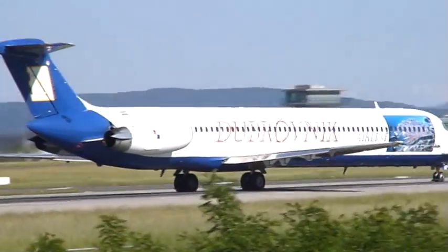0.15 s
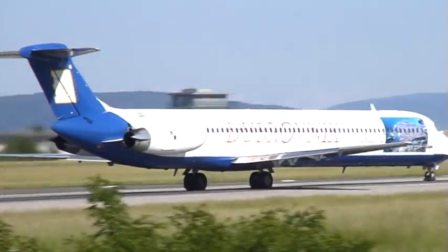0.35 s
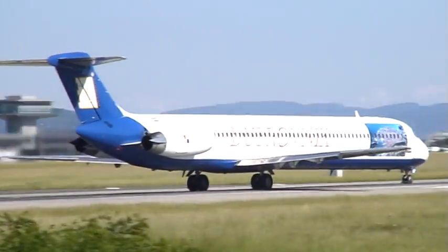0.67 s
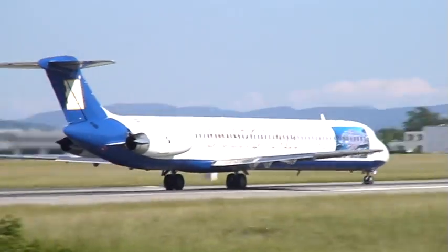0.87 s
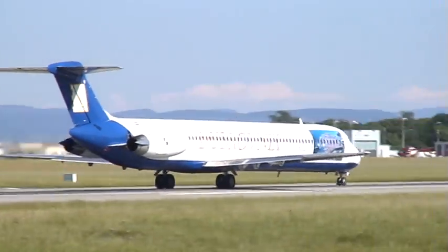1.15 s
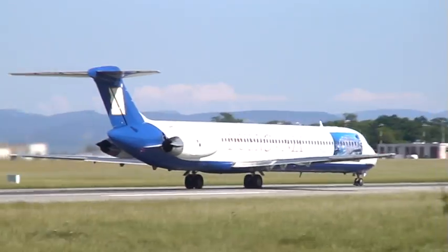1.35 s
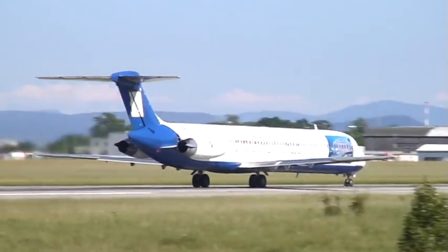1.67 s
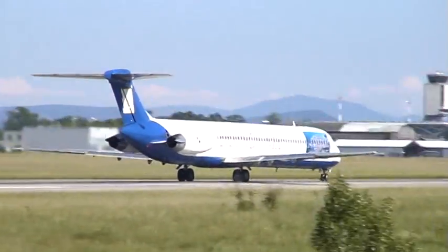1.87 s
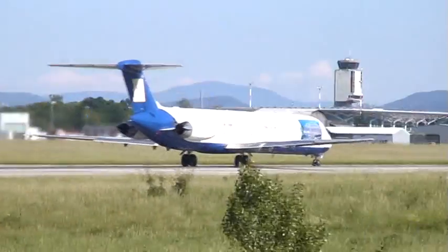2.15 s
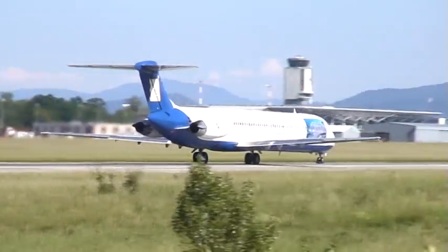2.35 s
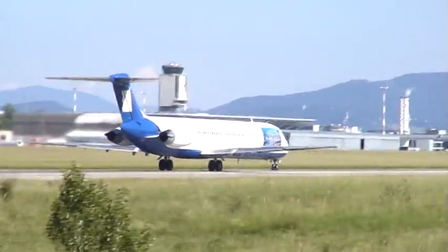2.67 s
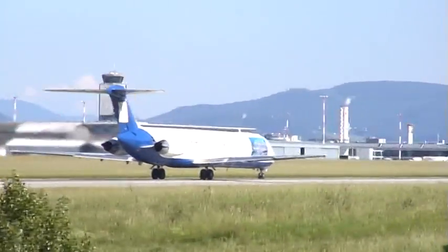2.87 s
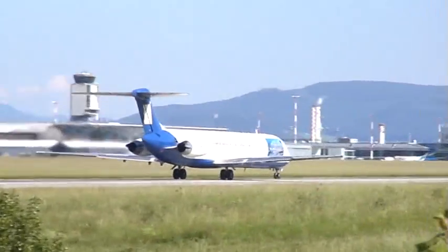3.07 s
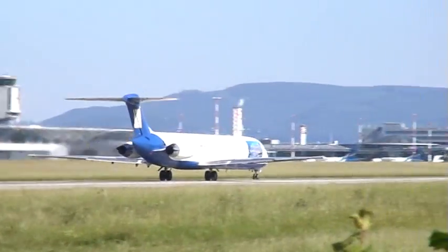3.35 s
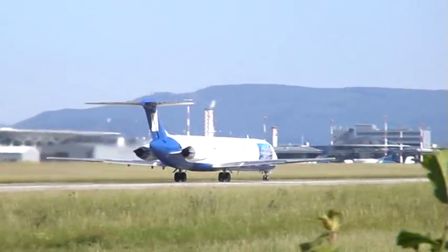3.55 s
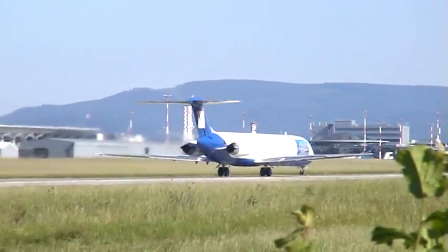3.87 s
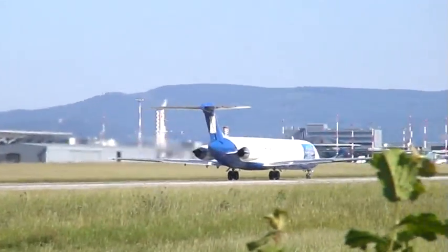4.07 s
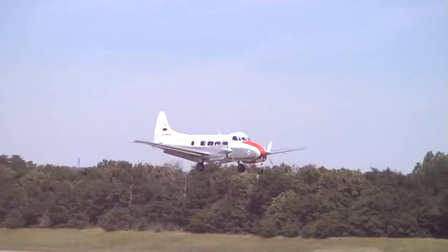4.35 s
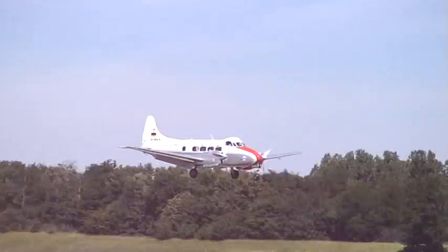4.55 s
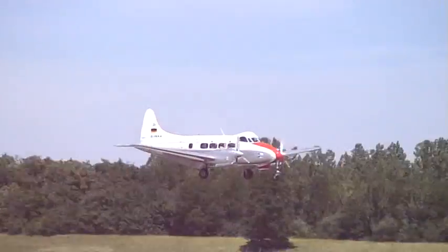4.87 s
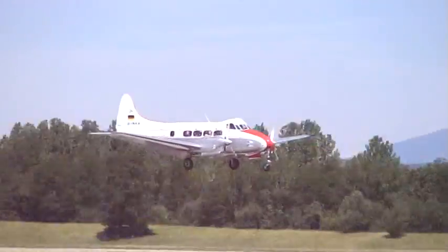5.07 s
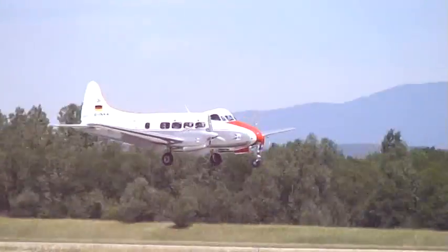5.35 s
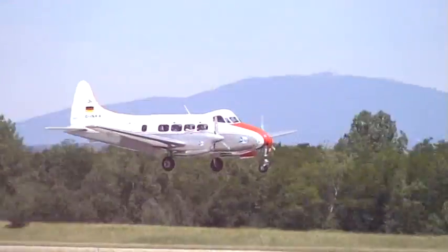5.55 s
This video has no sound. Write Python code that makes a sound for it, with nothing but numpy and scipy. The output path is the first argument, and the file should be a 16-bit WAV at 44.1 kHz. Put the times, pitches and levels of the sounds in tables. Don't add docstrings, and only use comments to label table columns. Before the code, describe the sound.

A jet airliner's thunderous rumbling roar rolls away along a runway, cuts to brief silence, then a quieter propeller plane drones closer over chirping birds.

```python
import sys
import numpy as np
from scipy import signal
from scipy.fft import rfft, irfft, next_fast_len
from scipy.io import wavfile
from scipy.ndimage import uniform_filter1d

SR = 44100
rng = np.random.default_rng(int(sys.argv[2]) if len(sys.argv) > 2 else 0)


def dump_mix(stems):
    frames = np.atleast_2d(stems).T
    limited = np.clip(frames, -1, 1)
    pcm = np.round(limited * 32767).astype(np.int16)
    wavfile.write(sys.argv[1], SR, pcm)


def invert_db(x):
    u = np.asarray(x, float) / 20
    return 10 ** u


N = 251370
T = np.arange(N) / SR
FADE_START_S, FADE_END_S = 4.152, 4.196
HOLD_END_S, RESUME_S = 4.2015, 4.281


def in_time(rows):
    s, *columns = np.transpose(rows)
    return [np.interp(T, s, c) for c in columns]


def at_hz(points, hz):
    f, *columns = np.transpose(points)
    return [np.interp(np.log(hz), np.log(f), c) for c in columns]


def drift(rate):
    r = np.exp(-80 * np.pi * rate / SR)
    slow = signal.lfilter([1], [1, -2 * r, r * r], rng.standard_normal(N // 40 + 2002))[2000:]
    return np.interp(np.arange(N) / 40, np.arange(len(slow)), rms_one(slow))


def rms_one(x):
    return x / np.sqrt(np.mean(x ** 2) + 1e-20)


def span_of(start_s, end_s):
    return slice(max(round(start_s * SR), 0), round(end_s * SR))


def swells(rows):
    out = np.zeros(N)
    for s, db, half_s in rows:
        span = span_of(s - 4 * half_s, s + 4 * half_s)
        out[span] += db * np.exp(-((T[span] - s) / half_s) ** 2)
    return out


def evened(bass, expected, firmness):
    envelope = np.sqrt(uniform_filter1d(bass[0] ** 2, size=1100) + 1e-12) / expected
    return bass * (rms_one(envelope) + 0.018) ** -firmness


def port_noise(colour, ports, hz, size):
    balance_db, alike, lead = at_hz(ports, hz)
    alike = np.clip(alike, 0, 1)
    near, apart = rfft(rng.standard_normal((2, size)))
    right = invert_db(-balance_db)
    middle = np.sqrt(1 + right ** 2 + 2 * alike * right * np.cos(lead)) / 2
    far = right * (alike * np.exp(-1j * lead) * near + np.sqrt(1 - alike ** 2) * apart)
    return np.array([near, far]) * invert_db(at_hz(colour, hz)[0]) / middle


def turbulence(colour, ports, bands_hz, levels_db, air_loss, shared_db, own_db, firmness,
               sweep=((20, 0), (20000, 0)), passing=0):
    size = next_fast_len(N)
    hz = np.maximum(np.arange(size // 2 + 1) * SR / size, 1)
    pair = port_noise(colour, ports, hz, size)
    swing = np.array(levels_db) - np.mean(levels_db, axis=1, keepdims=True)
    bass, rest, together = 0, 0, drift(11.0)
    for centre in 16 * 2 ** np.arange(0, 10, .5):
        share = np.cos(np.pi * np.clip(np.log2(hz / centre), -.5, .5)) ** 2
        place = np.interp(np.log(centre), np.log(bands_hz), np.arange(len(bands_hz)))
        low = min(int(place), len(bands_hz) - 2)
        place += air_loss * max(np.log2(centre / bands_hz[-1]), 0)
        level_db = swing[low] + (place - low) * (swing[low + 1] - swing[low])
        flicker_db = min(centre / 1000.0, 1) * shared_db * together + own_db * drift(9.8)
        sweep_db = at_hz(sweep, centre)[0] * passing
        band = invert_db(level_db + flicker_db + sweep_db) * irfft(pair * share, size)[:, :N]
        if centre < 120:
            bass = bass + band
        else:
            rest = rest + band
    expected = invert_db(swing[np.searchsorted(bands_hz, 50)])
    out = evened(bass, expected, firmness) + rest
    return out / np.sqrt(np.mean(out.mean(axis=0) ** 2))


# time in seconds, level in dB.
RUSTLE = [(0.05, -82), (0.5, -86), (1.28, -86), (1.9, -80.5), (3.06, -76.5), (3.67, -72.5), (4.15, -70),
          (4.28, -88), (4.81, -76), (5.65, -78)]


def rustle():
    mid, side = rng.standard_normal((2, N)) * invert_db(2.5 * drift(40.0))
    high = signal.butter(2, 7500, "high", fs=SR, output="sos")
    hiss = signal.sosfilt(high, mid + 0.63 * side * [[1], [-1]])
    hiss = hiss + 0.6 * signal.lfilter(*signal.iirpeak(11900, 8.0, fs=SR), hiss)
    return invert_db(in_time(RUSTLE)[0] + 5.5) * rms_one(hiss)


# start in seconds, peak in dB, decay time in ms.
TICKS = [(2.251, -46, 1.9), (2.86, -66, 1.6), (3.52, -58, 1.5), (3.365, -53, 1.5), (3.678, -43, 1.8),
         (3.719, -55, 1.1), (3.788, -45.5, 1.4), (4.0, -73, 2.9), (4.768, -49, 4.0), (5.062, -61, 2.6),
         (5.243, -67, 2.5), (5.678, -29, 0.92)]
# frequency in Hz, width in Hz, level in dB.
TICK_MODES = [(5000, 1200, 3), (7400, 1500, -4.5), (9000, 1200, -11), (11500, 1800, -5), (13300, 400, 0)]


def ticks(rows):
    burst, after = np.zeros(N), T[:round(.02 * SR)]
    for s, db, ms in rows:
        burst[round(s * SR):][:len(after)] += invert_db(db) * np.exp(-after * 1000 / ms)
    burst = burst * rng.standard_normal(N) + 1e-18
    out = np.zeros(N)
    for hz, width_hz, level_db in TICK_MODES:
        r, w = np.exp(-np.pi * width_hz / SR), 2 * np.pi * hz / SR
        ring = signal.lfilter([(1 - r * r) / 2, 0, (r * r - 1) / 2], [1, -2 * r * np.cos(w), r * r], burst)
        out += invert_db(level_db) * ring
    return out


def close_tick():
    knock_hz, knock_db, knock_t60_s = 830, -27, .014
    after = np.clip(T - 5.6795, 0, None)
    knock = invert_db(knock_db - 60 * after / knock_t60_s) * np.sin(2 * np.pi * knock_hz * after)
    top = signal.ellip(6, .5, 40, 13700, fs=SR, output="sos")
    return signal.sosfilt(top, ticks(TICKS[-1:])) + knock


def whistles(notes, pan_db):
    out, wobble = np.zeros(N), 1 + .01 * drift(200.0)
    for note in notes:
        s, pitch, level_db = np.transpose(note)
        span = span_of(s[0], s[-1])
        edges = np.clip(np.minimum(T[span] - s[0], s[-1] - T[span]) / .003, 0, 1)
        glide = np.cumsum(np.interp(T[span], s, pitch) * wobble[span])
        level = invert_db(np.interp(T[span], s, level_db) + 2.0)
        out[span] += edges * level * np.sin(2 * np.pi * glide / SR)
    out = out * invert_db(1.1 * drift(150.0))
    echo = 0.21 * np.roll(out, round(0.014 * SR))
    return (out + echo) * invert_db([[pan_db / 2], [-pan_db / 2]])


def peeps(rows):
    return [[(s, from_hz, db), (s + length, to_hz, db)] for s, length, from_hz, to_hz, db in rows]


def calls(rows):
    leap_s, sag_half_s, flick_s = .014, .0124, .009
    notes, second_voice = [], []
    for s, length, hz, db, sag in rows:
        notes.append([(s, .8 * hz, db - 6),
                      (s + leap_s, hz, db),
                      (s + leap_s + sag_half_s, .93 * hz, db - 4.0),
                      (s + length - flick_s, sag * hz, db - 0.5),
                      (s + length, sag * .96 / .9 * hz, db - 7)])
        if db < -53.5:
            second_voice.append((s + .021, .025, 1.125 * hz, 1.06 * hz, db - 7))
    return notes + peeps(second_voice)


# start in seconds, length in seconds, from Hz, to Hz, level in dB.
FAR_PEEPS = [
    (2.98, .02, 4400, 4920, -55),
    (3.38, 0.025, 5100, 4700, -55),
]


def runway_bird():
    return whistles(peeps(FAR_PEEPS), pan_db=-4.0)


# start in seconds, length in seconds, top in Hz, level in dB, lowest pitch as a share of the top.
FULL_CALLS = [
    (4.718, .062, 4650, -54, .89),
    (4.811, .053, 4520, -48, .925),
    (5.159, .042, 4780, -53, .9),
]
# start in seconds, length in seconds, from Hz, to Hz, level in dB.
PEEPS = [(4.724, .012, 4300, 5450, -55), (4.802, .012, 3150, 3700, -57), (4.826, .016, 4750, 4550, -55),
         (4.839, .008, 4450, 4150, -50), (4.851, .011, 4200, 4600, -50), (4.865, .016, 4220, 4200, -62),
         (4.886, .022, 4200, 4400, -59), (4.896, .008, 3300, 3150, -56), (4.907, .008, 3150, 3100, -53),
         (4.916, 0.013, 4250, 4000, -52), (4.921, .007, 4400, 3900, -56), (4.926, .008, 4050, 4800, -56),
         (5.218, .022, 4650, 4750, -61), (5.174, .02, 5550, 5250, -63), (5.238, .008, 5000, 5500, -57),
         (5.272, .018, 4250, 3950, -57)]
# start in seconds, length in seconds, from Hz, to Hz, level in dB.
RIGHT_PEEPS = [(4.797, .014, 4400, 4970, -59), (4.862, .018, 4200, 4220, -62),
               (4.88, .015, 5200, 5300, -67), (4.93, .01, 3950, 3900, -53), (4.95, .008, 4300, 4050, -62)]


def meadow_birds():
    return whistles(calls(FULL_CALLS) + peeps(PEEPS), pan_db=1.0) + whistles(peeps(RIGHT_PEEPS), pan_db=-12.0)


ORDERS = [3, 6, 9, 11, 12, 14, 15, 17, 18, 24, 26, 27, 29, 30, 32, 33, 34, 35, 36, 37, 38, 39, 40, 41, 42,
          43, 47]
# level far off in dB, share of the nearness.
ORDER_LEVELS = [(-60, 0.074), (-41, 0.14), (-52.5, .9), (-57, 0.0024), (-44.5, 0.53), (-61.5, .7),
                (-58.5, 0.84), (-60, -.3), (-54.5, -.1), (-62, 0.69), (-63.5, 1.7), (-62.5, 1.9),
                (-69, 0.97), (-65, .9), (-60, -0.22), (-69, .3), (-57, 1.2), (-63.5, 1.2), (-70, 1.5),
                (-63, 1.9), (-63, 0.59), (-62.5, 0.95), (-59, 0.74), (-59.5, 0.71), (-64.5, .9), (-62, .3),
                (-70, 1.1)]
# time in seconds, engine cycles in Hz.
CYCLE_RATE = [(4.29, 18.42), (4.6, 18.38), (5.1, 18.24), (5.5, 18.06), (5.7, 17.97)]
# time in seconds, nearness in dB.
APPROACH = [(4.29, -1.5), (4.6, -5), (4.9, -0.5), (5.05, 0.5), (5.33, 5.5), (5.5, 5), (5.69, 5)]
# frequency in Hz, level in dB.
SECOND_ENGINE = [(78, -54)]


def firing_orders(turn, near_db):
    opposed_s, beat_s, beat_depth = 5.12, 2.4, 0.76
    beat = 1 - beat_depth * np.cos(np.pi * (T - opposed_s) / beat_s) ** 2
    late, orders = slice(round(HOLD_END_S * SR), None), np.zeros(N)
    for k, (db, share) in zip(ORDERS, ORDER_LEVELS):
        level = invert_db(db + share * near_db[late] + 3.5 + 0.034 * k * drift(4.5)[late])
        if k == 6:
            level = level * beat[late]
        orders[late] += level * np.cos(k * turn[late] + 2 * np.pi * rng.random())
    for hz, db in SECOND_ENGINE:
        orders += invert_db(db + 2.0 + 1.8 * drift(3.6)) * np.sin(2 * np.pi * hz * T + 0.31 * drift(4.9))
    return orders * invert_db([[1.3], [-1.3]])


PISTON_BANDS_HZ = [60, 650, 2000, 6500]
RUSH_LAW = [
    (-0.81, 0.58),
    (1, 0.045),
    (0.51, 0.18),
    (0.58, 0.085),
]
# frequency in Hz, density in dB per Hz.
RUSH_COLOUR = [(12, -49), (35, 0), (80, 2), (140, 1), (350, -3), (650, -3.5), (900, -3), (1330, -11.5),
               (1580, -9), (1850, -13.5), (2150, -11), (2600, -17.5), (3200, -15), (3800, -22),
               (6200, -26.5), (8000, -36), (12000, -50)]
# frequency in Hz, left-right in dB, likeness 0-1, left lead in rad.
MEADOW_PORTS = [(30, -6, 0.8, 0.6), (119, 10, 0.1, -0.34), (492, 0.5, 0.8, -0.19), (2000, 5, 0.86, 0.4),
                (4400, 2, 0.5, 0.23), (8000, 2, 0.3, 0.28)]
# peak in seconds, rise in dB, half length in seconds.
GUSTS = [(4.48, 10, 0.089), (4.73, 6, 0.093), (4.9, 5, .04), (5.02, 2, .03), (5.15, -10, .08)]
# peak in seconds, rise in dB, half length in seconds.
LEAVES = [(4.29, 3, 0.034), (4.58, 3, 0.069), (5.04, -1.5, 0.054), (5.23, 3, 0.046), (4.83, 6, 0.17),
          (5.15, 4, 0.065), (5.68, 4.5, 0.23)]


def pistons():
    near_db = in_time(APPROACH)[0]
    turn = 2 * np.pi * np.cumsum(in_time(CYCLE_RATE)[0]) / SR + 0.008 * drift(6.3)
    orders = firing_orders(turn, near_db)
    levels = [near * near_db + gust * swells(GUSTS) for near, gust in RUSH_LAW]
    levels[2] = levels[2] + 0.85 * swells(LEAVES)
    levels[3] = levels[3] + swells(LEAVES)
    rush = turbulence(RUSH_COLOUR, MEADOW_PORTS, PISTON_BANDS_HZ, np.array(levels) * (T >= RESUME_S),
                      air_loss=0.039, shared_db=0.5, own_db=0.9, firmness=0.21)
    throb = 1 + 0.15 * np.cos(6 * turn) + 0.11 * np.cos(3 * turn)
    return orders + invert_db(-44.0) * throb * rush


# peak in seconds, centre in Hz, level in dB, half length in seconds.
HUMPS = [(0.042, 684, -27, 0.029), (0.082, 610, -16, 0.059), (.4, 490, -16, 0.016),
         (0.65, 1050, -20.5, .06), (1.055, 310, -17, 0.04), (1.681, 545, -21.5, 0.045),
         (1.708, 1356, -24, 0.034), (1.852, 609, -30, .06), (1.865, 1760, -27.5, 0.078),
         (2.003, 1726, -26.5, 0.034), (2.05, 199.4, -19, 0.12), (2.137, 742, -28.5, 0.042),
         (2.208, 930, -30, 0.085), (2.28, 1450, -38, 0.035), (2.8, 428, -26, 0.041), (3.9, 298, -38, 0.056),
         (3.901, 954, -32.5, 0.15), (2.498, 740, -31, 0.16), (2.762, 734, -27.5, 0.051),
         (2.971, 720, -26, 0.048), (3.178, 827, -21.5, 0.05), (3.36, 864, -28.5, 0.06),
         (3.427, 1268, -32, 0.047), (3.5, 1524, -33.5, 0.051), (1.017, 620, -28, 0.036),
         (3.96, 150.4, -21.5, 0.086), (2.06, 279.6, -26, 0.087), (.08, 186, -20.5, 0.076),
         (.44, 340, -23, 0.047), (0.751, 279.5, -22.5, .06), (.93, 192, -18.5, 0.056),
         (1.619, 215, -16, 0.038), (1.951, 97, -15.5, 0.09), (1.042, 44.6, -15, 0.049),
         (0.701, 49.7, -19.5, .08), (3.635, 885, -28, 0.081), (4.165, 812, -28.5, 0.057)]


def humps():
    slide_per_s = .3
    narrow, out = drift(70.0) + 1j * drift(87.0), np.zeros(N)
    for s, hz, db, half_s in HUMPS:
        span = span_of(s - 3 * half_s, s + 3 * half_s)
        t = T[span] - s
        carrier = np.exp(2j * np.pi * hz * t * (1 - slide_per_s * t))
        out[span] += invert_db(db - 6.5) * np.exp(-(t / half_s) ** 2) * np.real(narrow[span] * carrier)
    return out


JET_BANDS_HZ = [28, 65, 270, 1200, 4500, 9500]
# share of the loss, share of a clearing, dB gained as the exhausts turn, lumps in dB.
JET_LAW = [
    (0.05, 0.048, 0, 5.5),
    (0.05, .05, 15, 1),
    (.3, 0.46, -6.5, 0.9),
    (.6, 1.55, 1, 1.5),
    (1.0, 1.1, 3, 0.18),
    (1.5, 1.3, -3.5, 2.5),
]
# frequency in Hz, density in dB per Hz.
JET_COLOUR = [(8.8, -33.5), (15, -18.5), (53, 3), (74, 4.5), (126, -7.5), (269, -11.5), (410, -17),
              (467, -21.5), (640, -19), (1560, -25.5), (1930, -26.5), (4120, -40), (4700, -45),
              (5220, -45.5), (7950, -62.5), (10300, -80.5), (10700, -78.5), (11030, -89.5), (11700, -84.5),
              (12100, -90.5), (12400, -108), (17500, -130)]
# frequency in Hz, left-right in dB, likeness 0-1, left lead in rad.
JET_PORTS = [(20, 0, .55, 1.1), (32, 7, .85, 1.1), (50, 13, .93, 1.1), (66, 15, .75, 1.0),
             (86, 12.5, .35, 1.2), (110, 4, .08, 0), (160, 3, .55, -1.8), (215, 4, .65, -1.4),
             (330, 3.5, .83, -1.0), (490, .5, .9, -.7), (760, 3, .92, -.3), (1080, 1.5, 0.83, -0.3),
             (1390, 2, 0.78, 0.04), (2330, 2, 0.87, 0.2), (4400, 2, 0.78, -0.6), (9000, 2.5, 0.65, .5)]
# frequency in Hz, shift in dB.
JET_SWEEP = [(60, 1), (100, 2), (150, -20), (250, -2), (500, 1), (1500, -2), (4400, -3), (10000, 2)]
# time in seconds, level in dB.
DISTANCE = [(0, 0.5), (.25, -3.5), (1.0, -7.5), (1.7, -9), (2.4, -13), (3.0, -19.5), (3.6, -18.5),
            (4.2, -20)]
# peak in seconds, rise in dB, build-up in seconds.
CLEARINGS = [(0.129, 2, 0.38), (.33, 2, 0.1), (.52, 2.5, 0.2), (.665, 3, 0.08), (.9, 1.5, 0.37),
             (1.05, 0.5, 0.044), (1.085, -3, .015), (1.13, 1, .03), (1.3, 1.5, 0.14), (1.573, 5.5, 0.27),
             (1.71, 3.5, 0.095), (1.88, 2.5, 0.058), (2.1, 1, 0.45), (2.3, 2.5, 0.11), (2.58, 1.5, 0.14),
             (2.83, 3.5, 0.092), (2.998, 3, 0.045), (3.281, 2, 0.12), (3.39, 2, .07), (3.619, 2, 0.11),
             (3.78, 2.5, 0.053), (3.94, 1.5, 0.049), (4.185, 6.5, 0.036)]
# time in seconds, dB in the rumble, dB in the low roar.
EDDIES = [(0.14, 6, -1.5), (0.228, -2.5, -5), (.28, 0, -0.5), (.33, 5.5, -2.5), (.39, -8.5, 0.5),
          (.52, 5.5, -3), (.68, 4.5, -1.5), (0.741, -3.5, 4.5), (.93, 6, 2.5), (.99, -2.5, 3.5),
          (1.04, -1.5, 2), (1.09, 3.5, -4), (1.24, 4, -3), (1.44, 4.5, -0.5), (1.69, 0, 2.5),
          (1.75, 5.5, 0.5), (2.06, 6, -3.5), (2.108, -2.5, -5), (2.19, 1, 3.5), (2.329, 7, 2.5),
          (2.55, -3.5, 4), (2.85, -3, -0.5), (2.92, -3.5, -3), (3.0, 5.5, 0), (3.06, 0, -4),
          (3.3, -1.5, -6), (3.38, 0.5, 5), (3.66, -0.5, -3), (3.75, -2.5, -3), (3.82, 4, -7.5),
          (3.88, -2, -4.5), (4.019, 3, -4.5), (4.07, -12, -2), (4.14, -1, -1), (4.169, -8, 0)]


def jet():
    close_s, eddy_s, lumps_per_s = 0.043, 0.018, 8.4
    loss_db = in_time(DISTANCE)[0]
    clear_db = np.zeros(N)
    for s, db, build_s in CLEARINGS:
        clear_db += db * np.exp(-((T - s) / np.where(T < s, build_s, close_s)) ** 2)
    turned = np.tanh((T - 1.56) / 1.1) / 2
    levels = [far * loss_db + clear * clear_db + turn_db * turned + lumps_db * drift(lumps_per_s)
              for far, clear, turn_db, lumps_db in JET_LAW]
    rumble_db = swells([(s, rumble, eddy_s) for s, rumble, roar in EDDIES])
    low_roar_db = swells([(s, roar, eddy_s) for s, rumble, roar in EDDIES])
    for band, eddy_db in enumerate((rumble_db, rumble_db, low_roar_db)):
        levels[band] = levels[band] + eddy_db
    passing = np.tanh((T - 2.6) / 1.2) * [[.25], [-.25]]
    roar = turbulence(JET_COLOUR, JET_PORTS, JET_BANDS_HZ, levels, air_loss=0.3, shared_db=0.03, own_db=0.32,
                      firmness=0.4, sweep=JET_SWEEP, passing=passing)
    return invert_db(-15.5) * roar + humps() * invert_db([[.6], [-.6]])


# from seconds, to seconds.
TOP_OPEN = [(0, .03), (.25, .3), (1.05, 1.1), (1.3, 1.33), (1.55, 1.65), (2.0, 2.03), (2.18, 2.33),
            (2.56, 2.72), (2.82, 2.87), (3.08, 3.45), (3.48, 4.19), (4.7, 4.93), (5.1, 5.15), (5.23, 5.3),
            (5.64, 5.7)]


def top_gate(x):
    below = signal.sosfiltfilt(signal.ellip(6, .2, 40, 12020, fs=SR, output="sos"), x)
    is_open = sum((T >= start) & (T < end) for start, end in TOP_OPEN) * 1.0
    return below + uniform_filter1d(is_open, size=400) * (x - below)


def scene():
    runway = jet() + runway_bird()
    meadow = pistons() + meadow_birds()
    places = np.where(T < (HOLD_END_S + RESUME_S) / 2, runway, meadow)
    steady = places + rustle() + ticks(TICKS[:-1])
    dull = signal.ellip(10, .5, 70, 12800, fs=SR, output="sos")
    return top_gate(signal.sosfilt(dull, steady)) + close_tick()


def housing(x, delays_ms, strengths, edge_hz):
    size = next_fast_len(N + 100)
    hz = np.arange(size // 2 + 1) * SR / size
    treble = hz ** 2 / (hz ** 2 + edge_hz ** 2)
    bounce = np.array(strengths) * treble * np.exp(-2j * np.pi * hz * np.array(delays_ms) / 1000)
    return irfft(rfft(x, size) * (1 + bounce), size)[:, :N]


def roll_off(x):
    return signal.sosfilt(signal.butter(12, 14600, fs=SR, output="sos"), x)


HELD_OFFSET = [
    [-.0008],
    [.022],
]


def record(dry):
    x = housing(dry, delays_ms=[[.82], [.79]], strengths=[[-.45], [.4]], edge_hz=5200)
    x = x / (1 + (x / .77) ** 4) ** 0.13
    fade = np.clip((FADE_END_S - T) / (FADE_END_S - FADE_START_S), 0, 1)
    held = (1 - fade) * (T < HOLD_END_S) * HELD_OFFSET
    rise = np.clip((T - RESUME_S) / 0.0012, 0, 1)
    mix = (T < RESUME_S) * (fade * x + held) + rise * x
    return roll_off(mix)


dry = scene()
out = record(dry)
dump_mix(out)
```